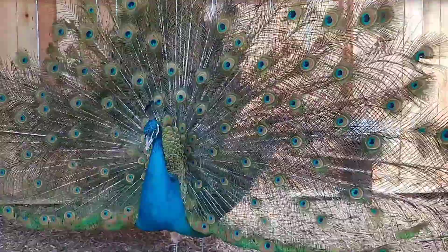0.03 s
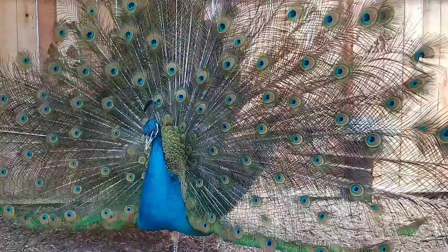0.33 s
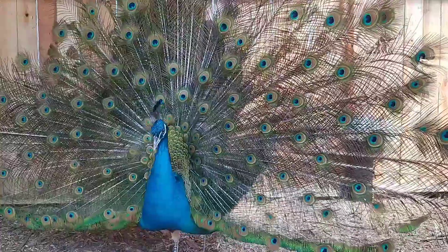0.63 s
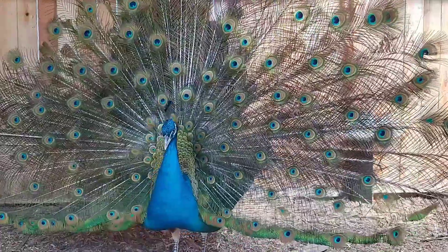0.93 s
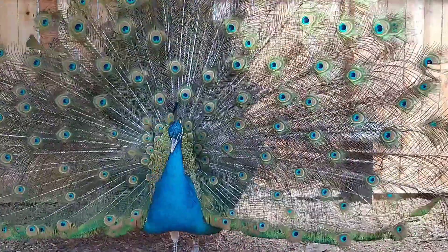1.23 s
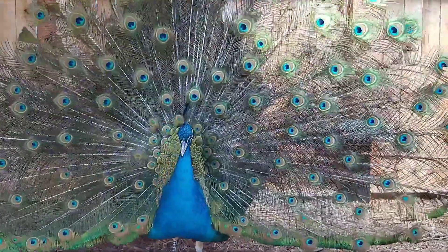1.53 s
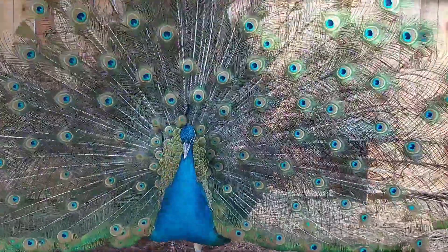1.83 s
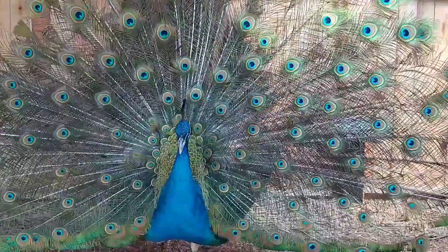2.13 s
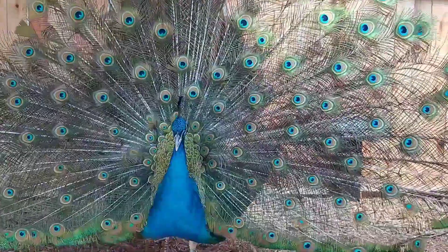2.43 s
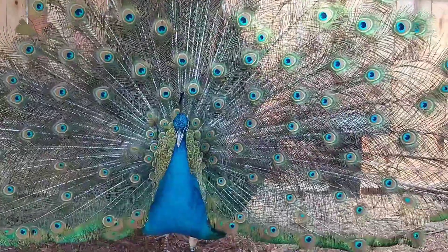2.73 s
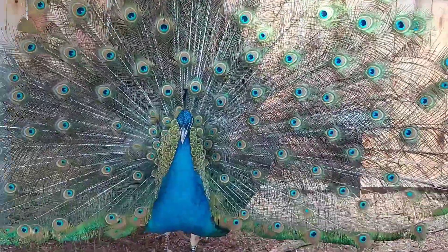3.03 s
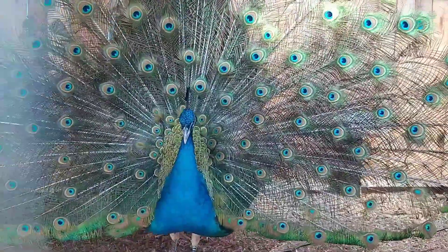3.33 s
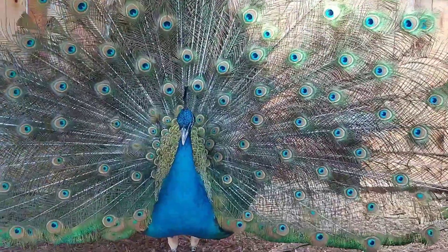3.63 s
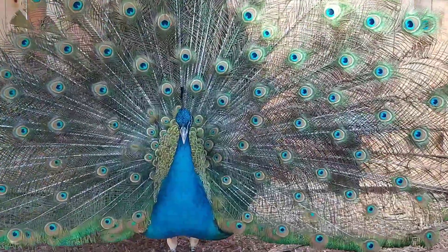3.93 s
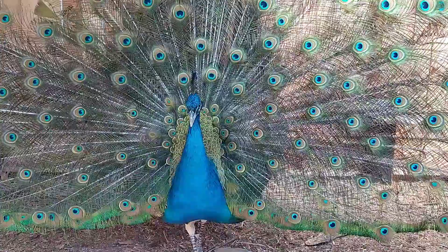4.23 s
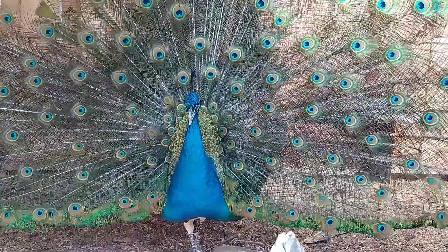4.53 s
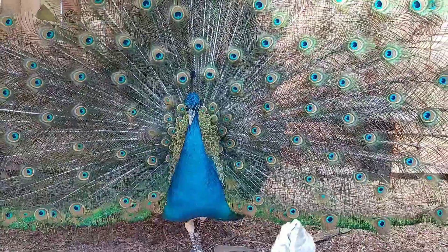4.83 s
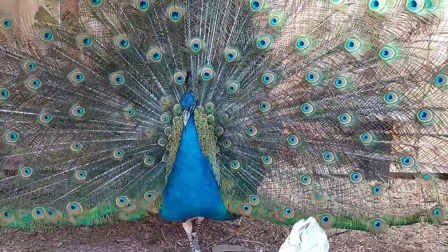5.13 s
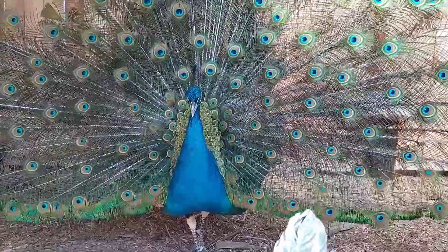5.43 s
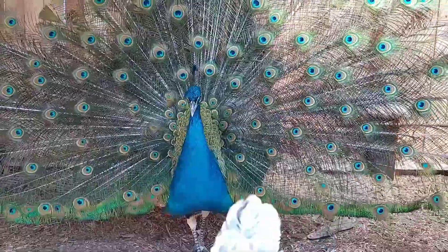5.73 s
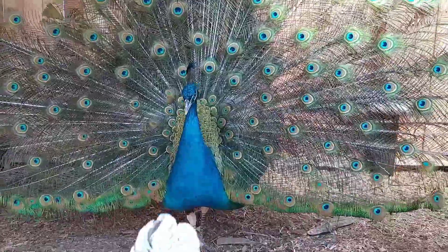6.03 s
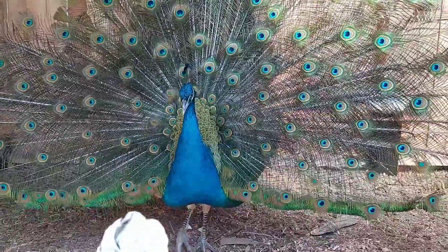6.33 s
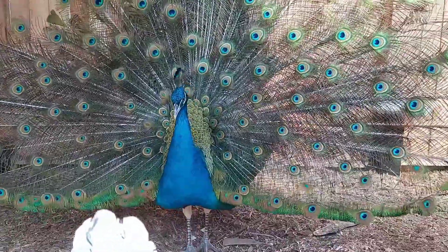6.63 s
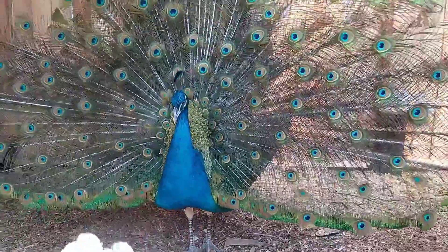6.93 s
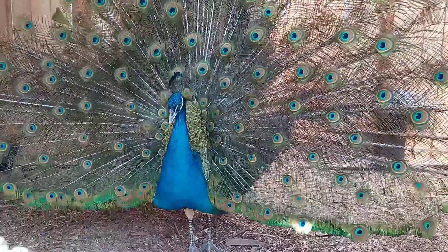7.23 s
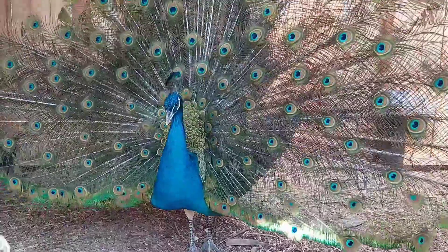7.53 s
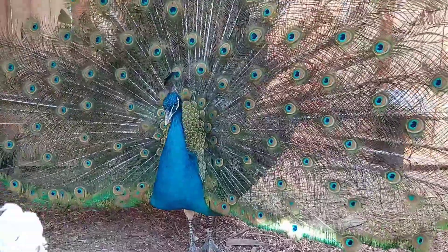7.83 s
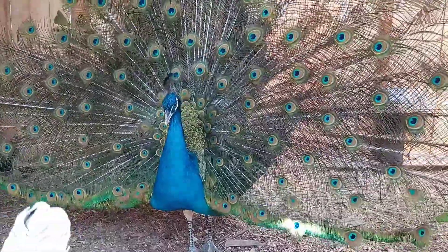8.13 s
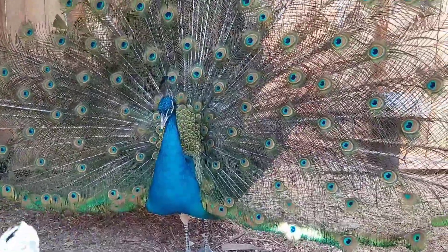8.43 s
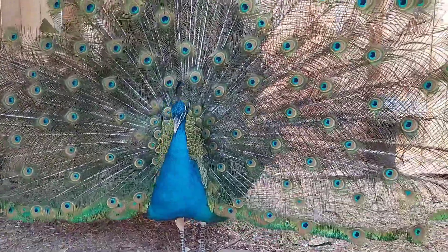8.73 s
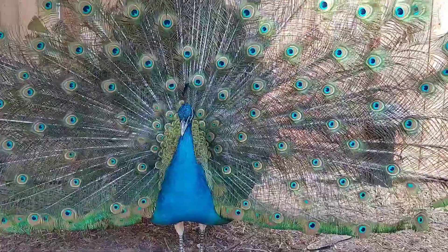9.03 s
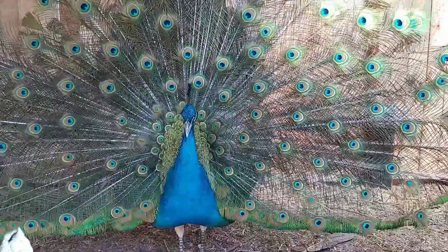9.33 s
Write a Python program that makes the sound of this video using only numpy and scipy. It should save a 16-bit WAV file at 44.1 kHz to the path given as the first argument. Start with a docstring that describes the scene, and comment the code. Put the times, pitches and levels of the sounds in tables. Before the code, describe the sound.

Down-sweeping chirps of a small bird sound close to the microphone on the left, with fainter birds whistling farther off in an outdoor enclosure. A peacock's fanned train rustles in waves. After a short dropout, five quick sliding peeps sound on the right, followed by a faint high trill, three short hoarse squawks and sparser chirps. Occasional dull knocks and dry quill clicks sit over a quiet rumble, and the calls carry a short echo.

```python
"""Small birds chirp from the left, each note sliding down, while a peacock shivers its spread train.
Its feathers brush together in swelling hisses. After four seconds all sound cuts out briefly, then five
peeps come from the right. Thin whistles, a high trill and hoarse squawks sound from farther off.
The calls are gliding tones that echo off the ground and the fence of the yard.
Scuffs, rasps, clicks and dull knocks come and go over a low rumble."""
import sys
import numpy as np
from scipy import signal
from scipy.fft import rfft, irfft
from scipy.io import wavfile
from scipy.ndimage import uniform_filter1d, map_coordinates

SR = 44100
rng = np.random.default_rng(int(sys.argv[2]) if len(sys.argv) > 2 else 0)


def wav_out(sig):
    """Save sig, one row per channel (or a flat mono array), as 16-bit PCM at SR to the path in sys.argv[1]."""
    wavfile.write(sys.argv[1], SR, np.round(np.clip(np.atleast_2d(sig).T, -1, 1) * 32767).astype(np.int16))


N = 422478
TIME = np.arange(N) / SR
SILENCE_S = (4.01, 4.352)  # start, end

# Tone colour of the low rumble and of the soft air: frequency_hz, relative_db
RUMBLE_COLOUR = [(20, -20), (44, -16), (54, 4), (67, -6), (82, -0.5), (100, -7.5), (140, -12), (178, 0),
                 (230, -11.5), (330, -15), (500, -22.5), (2000, -57.5)]
AIR_COLOUR = [(200, -18), (700, 1.5), (1800, -7), (2900, 6.5), (4000, 4.5), (5800, -10.5), (9000, -15),
              (12500, -25.5), (15500, -26)]
# How alike a noise is in the two ears: frequency_hz, likeness (1 is the same)
EAR_LIKENESS = [(130, 0.95), (300, 0.83), (1000, 0.31), (12000, 0.05)]
# How long the yard's echo takes to fade by 60 dB: frequency_hz, fade_s
ECHO_FADE = [(1500, 0.16), (3500, 0.34), (9000, 0.3), (15000, 0.016)]
# Bouts of trilling: start_s, end_s, level_db
TRILL_BOUTS = [(5.146, 7.65, -48.5), (7.698, 9.08, -46), (9.184, 9.58, -41.5)]
# Upper level of the distant flock's notes: time_s, level_db
FLOCK_LEVEL = [(0, -43.5), (3.5, -54.5), (5.5, -52), (9.5, -62.5)]
# Far chirps (a share is a fraction of the pitch): start_s, pitch_hz, level_db, fall_share
FAR_CHIRPS = [(0, 4770, -42, 0.34), (0.04, 5910, -35, 0.1), (.34, 4000, -46, 0.18),
              (.58, 4280, -48.5, 0.14), (1.28, 4310, -45, 0.2), (2.742, 3630, -42, 0.28),
              (3.041, 4560, -47.5, 0.19), (5.08, 3120, -55.5, 0.26), (5.51, 3310, -44.5, 0.23),
              (6.735, 4400, -48.5, 0.32), (8.011, 4685, -48, 0.22), (8.373, 4740, -49.5, 0.22),
              (8.711, 4060, -57, 0.31), (9.019, 3960, -59, 0.42)]
# Held whistles (a negative fall rises): start_s, length_s, pitch_hz, level_db, fall_share, waver_share
WHISTLES = [(0.439, 0.035, 3790, -35.5, 0.06, 0.01), (1, 0.053, 5040, -40, -0.1, 0.042),
            (1.069, 0.29, 1723, -53.5, 0.15, 0.013), (1.597, 0.16, 4316, -45.5, -0.036, 0.0048),
            (1.888, 0.17, 4424, -37.5, 0.056, .004), (2.169, 0.22, 4320, -41, 0.07, 0.0048),
            (2.516, 0.12, 4103, -38, 0.038, 0.0034), (3.713, 0.055, 3495, -40, 0.06, 0.017),
            (4.929, 0.474, 582, -58, -0.069, 0.037), (5.729, 0.043, 1926, -43, 0.051, .025),
            (6.047, 0.62, 6740, -48, 0.026, 0.0098), (5.91, 0.26, 5190, -50, 0.012, .005),
            (6.66, .38, 5470, -46, 0, .003), (8.107, 0.11, 3990, -56, 0.028, 0.0025),
            (8.583, 0.037, 6910, -42, 0.024, 0.0086)]
# Low scuffs on the ground: start_s, level_db
SCUFFS = [(2.165, -47.5), (2.264, -47.5), (8.085, -48.5), (8.49, -48.5), (8.801, -49.5), (9.179, -53)]
# Harsh rasps: start_s, level_db, centre_hz, width_octaves
RASPS = [(4.578, -37.5, 3070, 0.11), (5.765, -45.5, 3340, 0.34), (6.29, -46.5, 3880, 0.098),
         (6.489, -52, 2900, 0.22), (7.637, -42, 4460, 0.74), (8.806, -47, 1275, 0.2)]
# Dry quill clicks: start_s, level_db
QUILL_CLICKS = [(2.464, -34), (3.186, -28), (8.959, -33.5)]
# Dull knocks: start_s, level_db
KNOCKS = [(1.392, -37.5), (5.268, -31.5), (5.927, -30), (6.942, -38.5), (7.008, -37.5)]
# The tones that ring in a knock: pitch_hz, relative_db, fade_s (to fall 60 dB)
KNOCK_TONES = [(212, -6.5, 0.063), (329, 13, 0.0097), (533, 0.5, 0.013), (914, -6, 0.02),
               (1730, 1.5, 0.005)]
# Reedy squawks: start_s, pitch_hz, level_db
SQUAWKS = [(6.352, 560, -43.5), (6.425, 546, -42), (6.79, 552, -41.5)]
# Tone colour of brushing feathers: frequency_hz, relative_db
FEATHER_COLOUR = [(150, -41), (500, -6.5), (900, -5.5), (1900, -5.5), (2800, -3), (5000, -7), (7500, 0.5),
                  (9300, -1.5), (11000, -5.5), (12200, -19), (15500, -26.5)]
# Lean of the hiss before and after the peacock turns: frequency_hz, side_db (above 0 is left)
LEAN_FACING = [(300, -2), (1400, 14.5), (3300, 2), (5500, 13.5), (7200, 7), (9500, -10), (11000, 3),
               (14000, 3.5)]
LEAN_TURNED = [(2400, 2.7), (4400, 14.4), (7200, 3.2), (9000, 16.7), (11000, 8.7)]
# Shivers of the train: peak_s, level_db, side_db, length_factor
SHIVERS = [(.33, -43, -14.5, 0.64), (1.3, -45, -11, 0.32), (1.97, -35, -1.5, 1), (3.9, -49.5, -3, 0.68),
           (4.449, -47, -6, 0.89), (6.4, -42.5, -10, 0.31), (7.34, -36, -4, 0.82), (8.15, -50.5, 1, 0.72),
           (9.25, -50, -2.5, 0.77)]
# How overtones are lifted or lowered by frequency, most around 9.5 kHz: frequency_hz, boost_db
OVERTONE_BOOST = [(5400, -1.5), (6800, 3.5), (7700, -3), (9550, 14.5), (10700, 5.5), (12600, 1)]
# The course of one peep: time_s, base_pitch_hz, relative_db
PEEP_SHAPE = [(0, 5270, -18), (.015, 5040, -9), (.025, 4890, 0), (.052, 4330, -1), (.07, 3870, -9),
              (.094, 3490, -8), (.128, 3410, -19)]
# The five peeps: start_s, level_db, pitch_factor, overtones_db
PEEPS = [(4.338, -27, 0.99, -12.5), (4.546, -25.5, 0.98, -13.5), (4.765, -27, 1, -13.5),
         (4.978, -28, 1, -12.5), (5.205, -29, 0.99, -17.5)]
# A falling chirp bends down, breaks, then dives: time_from_peak_s, base_pitch_hz
CHIRP_SHAPE = [(-.135, 5350), (-.095, 5180), (-.058, 4670), (-.042, 3853), (-.013, 3230), (.003, 2567),
               (.022, 2066)]
# Near falling chirps, each with a softer lead-in that starts early_s before its peak:
# peak_s, level_db, pitch_factor, length_factor, lead_db, early_s, hoarse_share
NEAR_CHIRPS = [(.238, -28, 1.005, 0.88, -14.5, .13, 0.061), (.49, -35.5, 1.08, 0.94, -24.5, 0.078, 0.046),
               (0.72, -29, 1, 1.18, -11, .12, 0.073), (1.006, -30.5, .97, 1.04, -14.5, .13, 0.05),
               (1.414, -30, 0.94, 1.1, -7.5, .1, 0.054), (1.955, -31, 1.04, 1.14, -18, .12, 0.1),
               (2.182, -34.5, 1.1, 0.85, -8.5, 0.066, 0.066), (2.369, -25, 0.98, 0.98, -18, .12, 0.07),
               (2.848, -26, 0.98, 0.9, -13, 0.13, .07), (3.064, -34, 0.97, 0.85, -17, 0.063, 0.087),
               (3.448, -26.5, 0.99, 1.05, -18.5, .135, 0.081),
               (3.956, -28.5, 0.91, 0.89, -20.5, 0.13, 0.14), (5.655, -33.5, 0.98, 1.25, -14.5, 0.11, .05),
               (7.037, -33.5, 0.9, 0.97, -9, 0.096, 0.11), (7.926, -44, 0.97, 1.09, -1, 0.092, 0.073),
               (9.31, -38, 0.99, 1.09, -7.5, 0.12, 0.056)]


def amp(db):
    """Turns decibels into a gain."""
    return 10 ** (np.asarray(db) / 20)


def unit(x):
    """Scales a signal to an average power of 1."""
    return x / np.sqrt(np.mean(x ** 2) + 1e-20)


def curve(rows, t):
    """Reads each column of a table at times t."""
    times, *columns = np.transpose(rows)
    return [np.interp(t, times, column) for column in columns]


def spectrum(points, hz):
    """Reads a table at frequencies hz, with octaves evenly spaced."""
    table_hz, value = np.transpose(points)
    return np.interp(np.log(hz + 1), np.log(table_hz), value)


def before_after(pair, s):
    """Picks the first value until the silence ends, then the second."""
    return np.where(s < SILENCE_S[1], *pair)


def pan(side_db):
    """Left and right gains; above 0 dB the left is louder."""
    return unit(amp([[side_db / 2], [-side_db / 2]]))


def add(mix, start_s, sound):
    """Adds a stereo sound to the mix."""
    start = round(start_s * SR)
    sound = sound[:, max(-start, 0):]
    part = mix[:, max(start, 0):][:, :sound.shape[1]]
    part += sound[:, :part.shape[1]]


def wobble(t, per_s):
    """A smooth random wiggle, about 1 in size."""
    points = rng.standard_normal(int((t[-1] - t[0]) * per_s) + 4)
    return map_coordinates(points, [(t - t[0]) * per_s], order=3, mode="nearest")


def colour(x, points):
    """Turns each frequency up or down as a table says."""
    return irfft(rfft(x) * amp(spectrum(points, np.fft.rfftfreq(N, 1 / SR))), N)


def noise(points, patchy_db):
    """Stereo noise of a given colour whose level drifts in patches."""
    hz = np.fft.rfftfreq(4096, 1 / SR)
    a, b, c, d, patches = rng.standard_normal((N // 1024 + 5, len(hz), 5)).T
    patches = unit(uniform_filter1d(uniform_filter1d(patches, size=24, axis=0), size=4, axis=1))
    alike = np.clip(spectrum(EAR_LIKENESS, hz), 0, 1)[:, None]
    left = a + 1j * b
    right = alike * left + np.sqrt(1 - alike ** 2) * (c + 1j * d)
    bands = np.array([left, right]) * amp(spectrum(points, hz)[:, None] + patchy_db * patches)
    return unit(signal.istft(bands, nperseg=4096, noverlap=3072)[1][:, :N])


def yard(x, side_db, echo_db, fence_s=.024, fence_db=-5, ground_db=-2, ground_s=.0055):
    """Sound arrives directly, bounces off the ground and fence, and leaves a short echo."""
    t = np.arange(SR // 2) / SR
    bounces = rng.choice([-1., 1.], (2, len(t))) * (rng.random((2, len(t))) < 2000 / SR)
    hz, delay_s, bands = signal.stft(bounces * (t > .004), SR, nperseg=256)
    fade = amp(-60 * delay_s / spectrum(ECHO_FADE, hz)[:, None])
    tail = signal.istft(bands * fade, SR, nperseg=256)[1][:, :len(t)]
    ground = bounces * (t > .001) * np.exp(-t / ground_s)
    fence = bounces * np.exp(-abs(t - fence_s) / .00017)
    echoes = unit(tail) + amp(ground_db) * unit(ground) + amp(fence_db) * unit(fence)
    paths = amp(echo_db) * unit(echoes) / np.sqrt(len(t))
    paths[[0, 1], [3, 0]] += 1  # the direct sound, 3 samples later on the left
    return pan(side_db) * signal.fftconvolve(x[None], paths, axes=1) / np.sqrt(1 + amp(2 * echo_db))


def background(rumble_db=(-46, -50), air_db=(-49.5, -52)):
    """A lumpy distant rumble under a soft wash of air, both quieter after the silence."""
    rumble_gain = amp(before_after(rumble_db, TIME) + .29 * wobble(TIME, 8.7))
    rumble = rumble_gain * noise(RUMBLE_COLOUR, patchy_db=1.5)
    air = amp(before_after(air_db, TIME)) * noise(AIR_COLOUR, patchy_db=7.5)
    return rumble + air


def trill(settled_hz=8680, sharp_hz=603, settle_s=.76, sweep_hz=1100, notes_per_s=26.8, note_share=.36):
    """An insect-like run of tiny downward sweeps that starts a little high and settles."""
    centre_hz = settled_hz + sharp_hz * np.exp(-np.maximum(TIME - TRILL_BOUTS[0][0], 0) / settle_s)
    count = TIME * notes_per_s + .04 * wobble(TIME, 6) + .3
    place = np.clip((count % 1 - .5) / note_share, -.5, .5)  # runs from -0.5 to 0.5 in each note
    tone = np.cos(np.pi * place) * np.sin(2 * np.pi * np.cumsum(centre_hz - sweep_hz * place) / SR)
    level = sum(amp(db) * (TIME > start) * (TIME < end) for start, end, db in TRILL_BOUTS)
    level *= amp(1.8 * wobble(TIME, 27))
    return yard(2 * tone * level / np.sqrt(note_share), side_db=-2.5, echo_db=-10)[:, :N]


def far_birds(side_db=(5, 2.5), chirp_s=.11, chirp_waver=.012, flock_notes=90):
    """Plain chirps, held whistles and a faint flock: pure gliding tones with plenty of echo."""
    chirps = [(s, chirp_s, hz, db, fall, chirp_waver) for s, hz, db, fall in FAR_CHIRPS]
    flock, flock_fall, flock_waver = [], .23, .022
    for k, (when, pitch, length, softness) in enumerate(rng.random((flock_notes, 4))):
        s = (k + when) / flock_notes * N / SR
        db = curve(FLOCK_LEVEL, s)[0] - 6 * softness
        flock.append((s, .066 + .07 * length, 3100 + 1200 * pitch, db, flock_fall, flock_waver))
    out = np.zeros((2, N))
    for calls, echo_db in ((chirps + WHISTLES, -2), (flock, 4)):
        for s, length_s, start_hz, db, fall, waver in calls:
            t = np.arange(0, length_s, 1 / SR)
            hz = start_hz * (1 - fall * t / length_s) * (1 + waver * wobble(t, 259))
            level = signal.windows.tukey(len(t), .4) * amp(2.2 * wobble(t, 55))
            tone = level * np.sin(2 * np.pi * np.cumsum(hz) / SR)
            add(out, s, amp(db) * yard(unit(tone), before_after(side_db, s), echo_db))
    return out


def scuffs_and_rasps(scuff_s=.075, scuff_hz=430, scuff_octaves=.85, rasp_s=.069):
    """Short strokes of gritty noise: low for scuffs on the ground, higher for rasps."""
    out = np.zeros((2, N))
    scuffs = [(scuff_s, *row, scuff_hz, scuff_octaves) for row in SCUFFS]
    rasps = [(rasp_s, *row) for row in RASPS]
    for length_s, s, db, centre_hz, width in scuffs + rasps:
        t = np.arange(0, length_s, 1 / SR)
        grit = rng.standard_normal(len(t)) * amp(3 * wobble(t, 250))
        octaves_away = np.log2((np.fft.rfftfreq(len(t), 1 / SR) + 1) / centre_hz)
        band = np.exp(-.5 * (octaves_away / width) ** 2)
        stroke = irfft(rfft(grit) * band, len(t)) * signal.windows.tukey(len(t), .7)
        add(out, s, amp(db) * yard(unit(stroke), side_db=.5, echo_db=5))
    return out


def quill_clicks(band_hz=(300, 7000), fade_s=.0041):
    """Dry quills click: bursts of noise that die at once."""
    out, t = np.zeros((2, N)), np.arange(SR // 8) / SR
    band = signal.butter(2, band_hz, "band", fs=SR, output="sos")
    for s, db in QUILL_CLICKS:
        click = 2 * signal.sosfilt(band, rng.standard_normal(len(t))) * np.exp(-t / fade_s)
        add(out, s, amp(db) * yard(click, side_db=1.1, echo_db=2))
    return out


def knocks(rise_s=.0007):
    """Padded blows close by on the left, each ringing briefly with a few tones."""
    out, t = np.zeros((2, N)), np.arange(SR // 8) / SR
    ring = sum(amp(db - 60 * t / fade_s) * np.sin(2 * np.pi * hz * t) for hz, db, fade_s in KNOCK_TONES)
    ring *= 1 - np.exp(-t / rise_s)
    for s, db in KNOCKS:
        add(out, s, amp(db) * yard(-ring, side_db=11, echo_db=-12))
    return out


def squawks(length_s=.0683, fall_share=.121, throat_hz=1830, width_hz=390):
    """Hoarse calls across the yard: sagging overtones, loudest where the throat rings."""
    out, t = np.zeros((2, N)), np.arange(0, length_s, 1 / SR)
    for s, start_hz, db in SQUAWKS:
        hz = start_hz * (1 - fall_share * t / length_s) * (1 + .042 * wobble(t, 520))
        phase = 2 * np.pi * np.cumsum(hz) / SR
        tone = sum(np.sin(k * phase) / np.hypot(1, (k * hz - throat_hz) / width_hz) for k in range(3, 8))
        rattle = amp(3.5 * wobble(t, 450))
        call = unit(tone * rattle * signal.windows.tukey(len(t), .5))
        add(out, s, amp(db) * yard(call, side_db=1, echo_db=3))
    return out


def shivering(build_s=.77, die_s=.47, rest_db=-55):
    """The train's level in each ear: shivers build slowly and die faster, over a faint rustle."""
    power = amp(rest_db) ** 2
    for s, db, side_db, stretch in SHIVERS:
        from_peak = (TIME - s) / (stretch * np.where(TIME < s, build_s, die_s))
        power = power + (pan(side_db) * amp(db - 10 * np.minimum(from_peak ** 2, 10))) ** 2
    return np.sqrt(power)


def peacock_train(ticks_per_s=2500, tick_db=-5, flicker_db=1.03):
    """Thousands of feather barbs brush together: a ticking hiss that changes colour as the bird turns."""
    ticks = (rng.random((2, N)) < ticks_per_s / SR) * rng.standard_normal((2, N))
    ticks *= amp(1.9 * np.minimum(rng.exponential(1, (2, N)), 4))  # a few stand out
    hiss = noise(FEATHER_COLOUR, patchy_db=4)
    hiss += amp(tick_db) * unit(colour(ticks + .039 * ticks[::-1], FEATHER_COLOUR))
    for ear, sign in enumerate((1, -1)):
        poses = [colour(hiss[ear], [(hz, sign * db / 2) for hz, db in lean])
                 for lean in (LEAN_FACING, LEAN_TURNED)]
        hiss[ear] = before_after(poses, TIME)
    hiss[0] = np.roll(hiss[0], 14)  # reaches the left ear a little later
    return unit(hiss) * shivering() * amp(flicker_db * wobble(TIME, 50))


def voice(t, hz, second_db, third_db, rough, flutter_db, undertone=0):
    """A small bird's nearly pure tone with two overtones; a hoarse voice stumbles every third cycle."""
    hz = hz * (1 + .004 * wobble(t, 160) + rough * np.tanh(wobble(t, 700)))
    phase = 2 * np.pi * np.cumsum(hz) / SR
    tone = np.sin(phase) + undertone * np.sin(phase * 2 / 3)
    for k, db in enumerate((second_db, third_db), 2):
        tone += amp(db + spectrum(OVERTONE_BOOST, k * hz)) * np.sin(k * phase)
    return np.sqrt(2) * tone * amp(flutter_db * wobble(t, 126.9))


def peep(pitch, overtones_db):
    """A clear note that slides down and fades; its upper overtone takes over from the lower."""
    t = np.arange(0, PEEP_SHAPE[-1][0], 1 / SR)
    hz, db = curve(PEEP_SHAPE, t)
    top_hz, end_hz = PEEP_SHAPE[0][1], PEEP_SHAPE[-1][1]
    swap_db = 9 * np.clip((top_hz - hz) / (top_hz - end_hz), 0, 1) ** 2
    second_db, third_db = overtones_db - swap_db, overtones_db - 17 + swap_db
    tone = voice(t, pitch * hz, second_db, third_db, rough=.008, flutter_db=1.3)
    return amp(db) * signal.windows.tukey(len(t), .1) * tone


def falling_chirp(pitch, stretch, lead_db, early_s, hoarse, bottom_hz):
    """A soft lead-in breaks into a loud, jerky dive that grows hoarse on the way down."""
    lead_s, break_s, dive_s, hold_s = .057, .04, .066, .015  # all scaled by stretch
    t = np.arange(-early_s, (break_s + hold_s / 2) * stretch, 1 / SR) / stretch  # 0 at the peak
    leading = t < -break_s
    lead_progress = 1 + (t + break_s) / lead_s
    depth = np.clip((t + break_s) / dive_s, 0, 1)
    jerky_t = t + .0035 * wobble(t, 130)  # the fall halts and jumps
    hz = np.maximum(pitch * curve(CHIRP_SHAPE, jerky_t)[0], bottom_hz)
    swell_db = np.maximum(647.5 * np.minimum(t + hold_s / 2, 0), max(-10, lead_db))
    fade_db = 527 * np.maximum(t - hold_s / 2, 0)
    rattle_db = 3.5 * wobble(t, 450)
    db = np.where(leading, lead_db + 2 * (2 * lead_progress - 1) ** 2, swell_db - fade_db + rattle_db)
    second_db = np.where(leading, -23, -6 - 18 * depth)
    third_db = -40 + 24 * depth ** 2
    rough = hoarse * (.25 + depth ** 2) * np.clip(1 - t / hold_s / 2, .3, 1)  # clears as it lands
    undertone = (4.85 * hoarse * depth ** 2) ** 2
    tone = voice(t, hz, second_db, third_db, rough, flutter_db=3, undertone=undertone)
    soft_start = np.minimum((t - t[0]) / .03, 1)
    return tone * uniform_filter1d(amp(db), size=40) * soft_start


def near_birds(chirp_side_db=(8.5, 3.5), bottom_hz=(2108, 2344)):
    """One bird chirps on the left and another peeps on the right."""
    out = np.zeros((2, N))
    for s, db, pitch, stretch, lead_db, early_s, hoarse in NEAR_CHIRPS:
        tone = falling_chirp(pitch, stretch, lead_db, early_s, hoarse, before_after(bottom_hz, s))
        echo_db = -4 - .32 * (db + 26)  # a weaker chirp is farther off, so it carries more echo
        add(out, s - early_s, amp(db) * yard(tone, before_after(chirp_side_db, s), echo_db))
    for s, db, pitch, overtones_db in PEEPS:
        tone = peep(pitch, overtones_db)
        add(out, s, amp(db) * yard(tone, side_db=-5, echo_db=-6, fence_db=-11, ground_db=-7))
    return out


def scene():
    """Everything in the yard, added together."""
    calls = near_birds() + far_birds() + squawks() + trill()
    return calls + peacock_train() + scuffs_and_rasps() + quill_clicks() + knocks() + background()


def record(dry, top_hz=15700):
    """Cuts the sound briefly to silence and takes off the very highest treble."""
    sounding = (TIME < SILENCE_S[0]) | (TIME > SILENCE_S[1])
    treble_cut = signal.firwin(511, top_hz, window=("kaiser", 9), fs=SR)
    return signal.oaconvolve(dry * sounding, treble_cut[None], "same")


dry = scene()
out = record(dry)
wav_out(out)
```